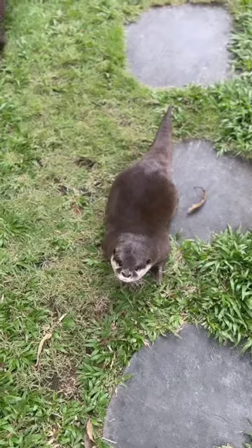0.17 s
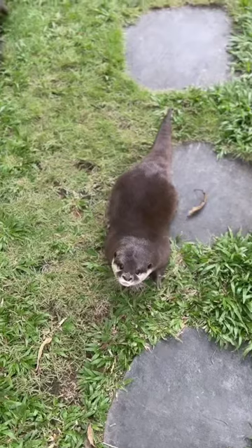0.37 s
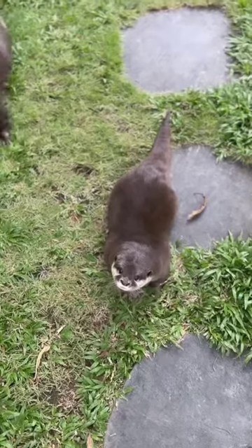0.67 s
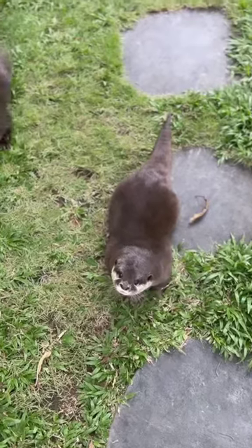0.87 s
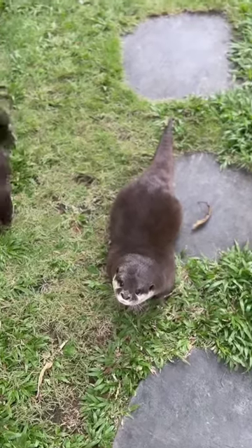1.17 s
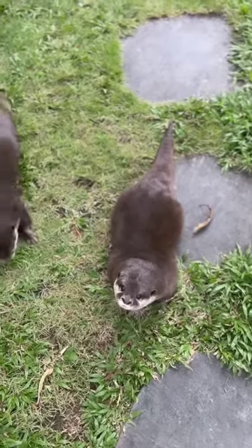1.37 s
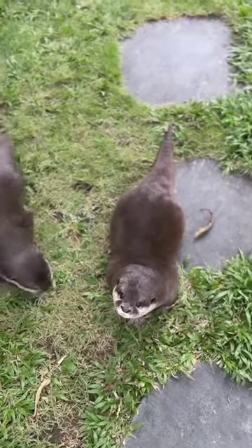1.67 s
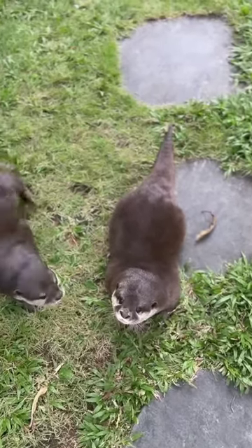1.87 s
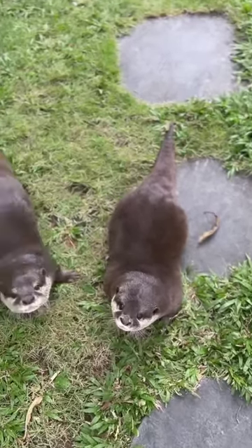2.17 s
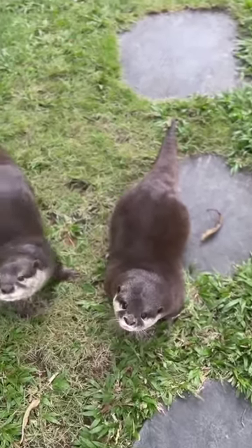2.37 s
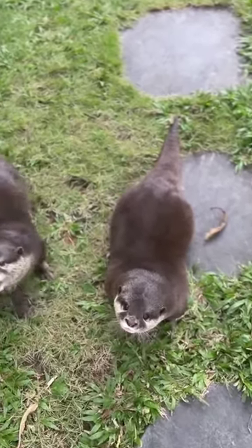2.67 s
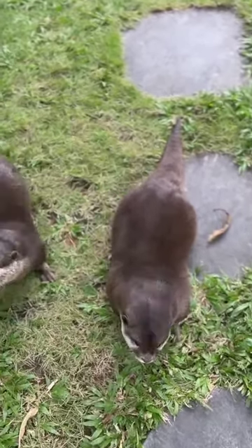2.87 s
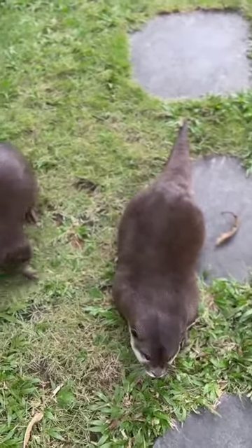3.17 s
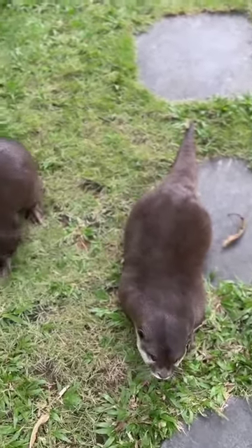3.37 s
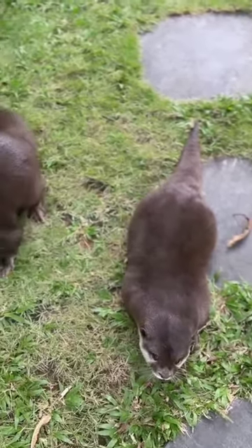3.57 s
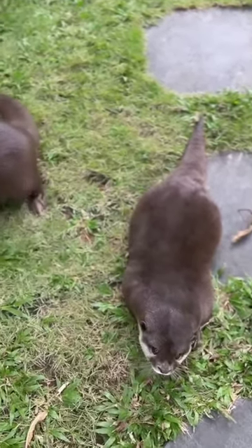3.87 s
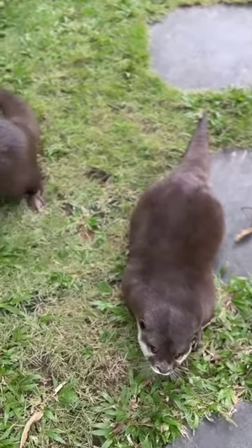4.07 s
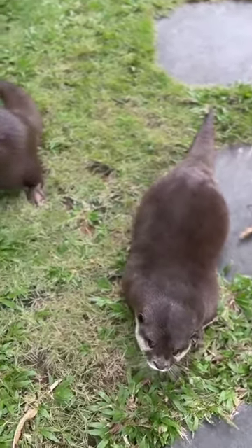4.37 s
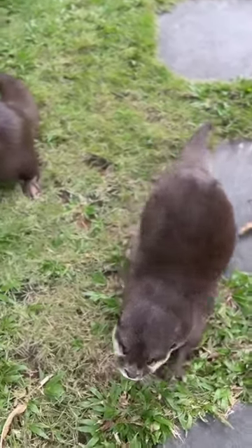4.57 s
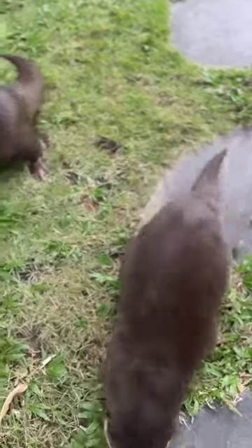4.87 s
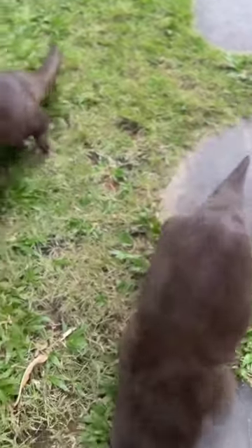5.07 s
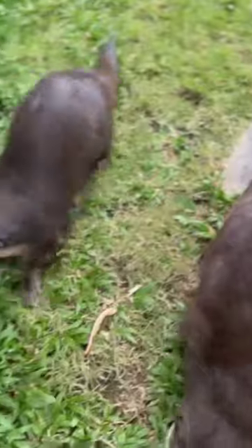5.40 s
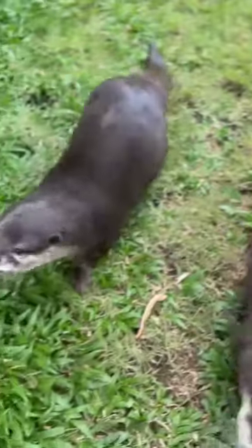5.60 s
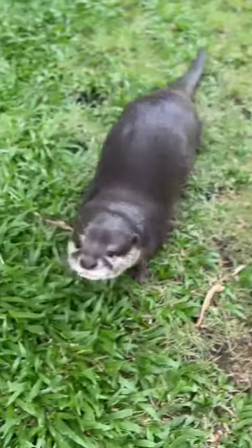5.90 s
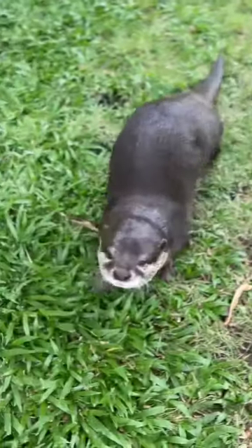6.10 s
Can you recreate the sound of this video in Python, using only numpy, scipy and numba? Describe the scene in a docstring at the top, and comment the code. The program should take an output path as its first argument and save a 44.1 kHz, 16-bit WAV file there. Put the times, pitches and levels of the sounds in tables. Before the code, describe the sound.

Two otters on a lawn give long, harsh, buzzing high squeals and quick falling chirps, with grass rustles, distant hammering and a low machine hum.

```python
"""On a lawn, two otters beg close by: long buzzing squeals, one short grunt and chirps, most high and falling.
Squeals are pulse trains and breath through moving resonances; chirps are gliding whistles in a hiss.
Paws rustle as swells of crackling noise, with a few stem snaps. Far off a hammer rings wood between walls,
a machine hums near 100 Hz, and the air is shaped noise. Two microphone ports hear the scene in stereo."""
import sys
import numpy as np
from scipy import signal
from scipy.fft import rfft, irfft, next_fast_len
from scipy.io import wavfile
from scipy.ndimage import uniform_filter1d, map_coordinates
from numba import njit

SR = 44100
rng = np.random.default_rng(int(sys.argv[2]) if len(sys.argv) > 2 else 0)


def master_out(mix):
    """Clip the mix to full scale and print it as 16-bit PCM to the path in sys.argv[1]."""
    frames = np.transpose(np.atleast_2d(mix))
    ceiling = np.clip(frames, -1, 1)
    pcm = np.round(ceiling * 32767).astype(np.int16)
    wavfile.write(sys.argv[1], SR, pcm)


def to_linear_factor(level_db):
    """Convert decibel levels (scalar or array-like) to linear amplitude factors."""
    exponent = np.asarray(level_db, float) / 20
    return 10 ** exponent


N = 275184  # samples


def unit(x):
    """Scale to rms 1."""
    return x / np.sqrt(np.mean(x ** 2) + 1e-20)


def along(points, hz):
    """Read (f/Hz, value) points on a log frequency axis."""
    f, v = np.transpose(points)
    return np.interp(np.log(hz + 1), np.log(f + 1), v)


def span(rows):
    """First sample, then one value per sample for each column after the time."""
    s, *cols = np.transpose(rows)
    n = np.arange(round(s[0] * SR), min(N, round(s[-1] * SR)))
    return n[0], [np.interp(n / SR, s, c) for c in cols]


def wobble(n, rate):
    """A smooth random curve, rate knots a second."""
    knots = rng.standard_normal(int(n * rate / SR) + 4)
    return map_coordinates(knots, [np.arange(n) * rate / SR])


def fade(n, seconds):
    """Linear fade in and out."""
    to_edge = np.minimum(np.arange(n), np.arange(n)[::-1])
    return np.clip(to_edge / (seconds * SR), 0, 1)


def filtered(x, response):
    """Filter x by a complex response of frequency."""
    m = next_fast_len(x.shape[-1] + 8192)
    return irfft(rfft(x, m) * response(np.fft.rfftfreq(m, 1 / SR)), m)[..., :x.shape[-1]]


def coloured(n, spectrum):
    """Noise of rms 1 with a given spectral shape."""
    return unit(filtered(rng.standard_normal(n), lambda hz: to_linear_factor(along(spectrum, hz))))


@njit
def resonate(x, turn, radius):
    """A two-pole resonance whose pitch and width move sample by sample."""
    y = np.zeros(len(x))
    for i in range(2, len(x)):
        echo = 2 * radius[i] * np.cos(turn[i]) * y[i - 1] - radius[i] * radius[i] * y[i - 2]
        y[i] = x[i] - x[i - 2] + echo
    return y


def cavity(x, hz, width_hz):
    """x through one moving resonance, at rms 1."""
    radius = np.exp(-np.pi * abs(width_hz + 0 * x) / SR)
    return unit(resonate(x, 2 * np.pi * (hz + 0 * x) / SR, radius))


def passed(x, hz, width_hz):
    """The part of x that lies in a moving band, at its own level."""
    radius = np.exp(-np.pi * abs(width_hz + 0 * x) / SR)
    return (1 - radius ** 2) / 2 * resonate(x, 2 * np.pi * hz / SR, radius)


def tail(decay, seconds):
    """Two unrelated noise echo tails, the first of energy 1; each frequency dies at its own speed."""
    hz, t, z = signal.stft(rng.standard_normal((2, int(seconds * SR))), SR, nperseg=128)
    dying = z * to_linear_factor(-60 * t / along(decay, hz)[:, None])
    h = signal.istft(dying, SR, nperseg=128)[1]
    return h / np.linalg.norm(h[0])


EDGE_DB = 13  # how far down fundamental and throat start and end
THROAT_GROWS = 0.0225  # share of the growth that the throat takes
# the nose swallows a band just over the mouth ring
NOSE_ABOVE_HZ, NOSE_WIDTH_HZ, NOSE_SHARE = 580, 450, .75


def buzz(rows, tract, tract_db, voice, rough, throat):
    """Vocal folds clap once a cycle and let a puff of breath through; throat, mouth and nose ring."""
    start, (hz, mouth_db, shrill_db) = span(rows)
    mouth_hz, *pitches = span(tract)[1]
    base_db, octave_db, throat_db, cheek_db, growth_db, attack, release = voice
    breath_share, first, last = rough
    n = len(hz)
    t = np.arange(n) / SR
    edge_db = -EDGE_DB * np.clip(1 - np.minimum(t / attack, t[::-1] / release), 0, 1)
    broken = (first + (last - first) * (t / t[-1]) ** 4) * (1 + .25 * wobble(n, 13))
    broken = np.clip(broken, 0, .9)

    # rough voices jitter more in pitch and in the strength of each beat
    jitter = .007 + .012 * broken
    scatter_db = .8 + 1.2 * broken
    cycles = np.cumsum(hz * (1 + jitter * wobble(n, 120))) / SR
    beat = cycles.astype(int)
    # strong and weak beats alternate and slip
    size = 1 + .45 * broken * np.sign(wobble(n, 25) + .2) * (-1) ** beat
    size = size * to_linear_factor(scatter_db * rng.standard_normal(beat[-1] + 2)[beat])

    claps = size * np.exp(-(np.sin(np.pi * cycles) * SR / hz / 4) ** 2)  # about two samples wide
    rebound = np.roll(claps, round(.0009 * SR))  # a broken beat claps again
    cracks = unit(claps + .7 * broken * rebound * wobble(n, 150))
    claps = unit(claps)
    puffs = unit((.35 + size * np.exp(-3.5 * (cycles % 1))) * rng.standard_normal(n))
    source = np.sqrt(1 - breath_share) * cracks + np.sqrt(breath_share) * puffs

    waver_db = 3
    upper = 0
    for pitch, (a, b), width_hz in zip(pitches, tract_db, [380, 280, 300, 360, 600]):
        level_db = a + (b - a) * t / t[-1] + waver_db * wobble(n, 14.51)
        upper = upper + to_linear_factor(level_db) * cavity(source, pitch * (1 + .014 * wobble(n, 12.4)), width_hz)
    upper = unit(upper) + to_linear_factor(-10 + waver_db * wobble(n, 10)) * cavity(source, 3800, 400)
    # the bare snap of the folds
    upper = upper + to_linear_factor(-11) * cavity(cavity(cracks, 5600, 4500), 6500, 5000)
    # the shrill part fades away above about 9 kHz
    upper = filtered(upper, lambda f: 1 / (1 + (f / 9300) ** 8))
    upper = upper + to_linear_factor(-36) * cavity(puffs, 10500, 3000)

    raspy = claps + (.15 + 1.1 * broken) * puffs
    low = cavity(raspy, *throat) + to_linear_factor(cheek_db - throat_db) * cavity(raspy, 1750, 600)
    breathy = claps + (.2 + 1.5 * broken) * puffs
    mouth = cavity(cavity(breathy, mouth_hz, 550), mouth_hz, 140 + 380 * broken)
    octave = to_linear_factor(octave_db - base_db) * np.cos(4 * np.pi * cycles)
    base = np.sqrt(2) * (np.cos(2 * np.pi * cycles) + octave)

    body = to_linear_factor(base_db + growth_db * t) * base
    body = body + to_linear_factor(throat_db + THROAT_GROWS * growth_db * t) * low
    call = to_linear_factor(edge_db) * body - to_linear_factor(mouth_db) * mouth + to_linear_factor(shrill_db) * upper
    call = call - NOSE_SHARE * passed(call, mouth_hz + NOSE_ABOVE_HZ, NOSE_WIDTH_HZ)
    return start, call * fade(n, 0.004)


# spectral shape of the breath in a chirp: (f/Hz, relative level/dB per Hz)
BREATH_COLOUR = [(800, -120), (1500, -16), (3000, -5), (6000, -8.5), (9000, -6.5), (12000, 2.5),
                 (15000, -38.5)]
TOP_HZ, FALL_BREATH_DB = 5500, 10  # the octave can sag under this pitch; a fast fall is breathier


def chirp(rows, octave_db, sag_db, breath_db, rough_db):
    """A whistle with overtones, fluttering in pitch and level, in a hiss of breath."""
    start, (hz, db) = span(rows)
    n = len(hz)
    falling = np.clip(-np.gradient(uniform_filter1d(hz, 200)), 0, 1.5)  # Hz a sample
    phase = 2 * np.pi * np.cumsum(hz * (1 + (.014 + .02 * falling) * wobble(n, 400))) / SR
    rough_db = rough_db + 3 * falling  # the tone breaks up while it falls
    second_db = db + octave_db - sag_db * np.maximum(TOP_HZ - hz, 0) / 1000
    whistle = to_linear_factor(db + rough_db * np.minimum(wobble(n, 270.33), .5)) * np.sin(phase)
    overtones = np.sin(2 * phase) + to_linear_factor(-11.5) * np.sin(3 * phase) * (hz < 4500)
    overtones = to_linear_factor(second_db + rough_db * np.minimum(wobble(n, 253.8), .5)) * overtones
    hiss = to_linear_factor(breath_db + FALL_BREATH_DB * falling) * coloured(n, BREATH_COLOUR)
    return start, (np.sqrt(2) * (whistle + overtones) + hiss) * fade(n, 0.00055)


# path of each buzzing call, the grunt last: (t/s, pitch f/Hz, mouth ring level/dB, shrillness level/dB)
SQUEAL_PATHS = [
    [(.02, 217.5, -26.5, -35), (.14, 219.4, -28.5, -32.5), (.23, 218.6, -28, -28.5),
     (.33, 226.1, -31.5, -26), (.37, 228.3, -22.5, -24.5), (.42, 222.5, -24.5, -29), (.5, 224.4, -27, -36),
     (.6, 232.2, -33.5, -35), (.66, 225, -30, -39), (.72, 212.3, -48.5, -50)],
    [(2.43, 215.8, -53.5, -59), (2.48, 220.9, -25.5, -34), (2.525, 254.8, -30.5, -28.5),
     (2.575, 231.6, -27, -26), (2.66, 219.2, -30, -31.5), (2.75, 239.9, -25.5, -24),
     (2.8, 232.1, -27, -25.5), (2.92, 232, -25.5, -25.5), (3.02, 231.8, -26.5, -26.5),
     (3.18, 219, -30.5, -28), (3.22, 226.4, -26.5, -26), (3.31, 231.3, -27, -26), (3.4, 240, -27, -31.5),
     (3.5, 252.7, -24.5, -30), (3.57, 236.5, -27.5, -42.5), (3.68, 246.3, -31.5, -42),
     (3.74, 219.4, -56.5, -66)],
    [(4.52, 223.1, -32, -38.5), (4.58, 248.5, -27.5, -34), (4.62, 248.8, -26.5, -26),
     (4.73, 257.7, -23.5, -28), (4.82, 249, -25.5, -28), (4.92, 239.8, -28, -30.5), (5.04, 245.4, -22, -31),
     (5.09, 242.6, -21.5, -28), (5.15, 247.4, -24, -31), (5.2, 240, -25, -35.5),
     (5.25, 220.9, -73.5, -55.5)],
    [(5.695, 370.3, -53, -74), (5.711, 398.2, -31.5, -47), (5.747, 374.7, -24.5, -42),
     (5.78, 386.5, -37, -45), (5.8, 391, -75.5, -80.5)],
]
# resonances move with jaw and lips in each call: (t/s, mouth f/Hz, five upper resonances f/Hz)
TRACT_PATHS = [
    [(.02, 2600, 4300, 4750, 5600, 6900, 7800), (.12, 2620, 4300, 4750, 5700, 7000, 7900),
     (.2, 2760, 4300, 4800, 6000, 7400, 8300), (.28, 2800, 4300, 4850, 6400, 8000, 8900),
     (.33, 2600, 4500, 5600, 7000, 8500, 9300), (.4, 2520, 4750, 6200, 7700, 9000, 9600),
     (.45, 2480, 4700, 6400, 7900, 9000, 9600), (.54, 2450, 4500, 6100, 7500, 8500, 9300),
     (.6, 2420, 4700, 6000, 7300, 8300, 9200), (.66, 2550, 4700, 6050, 7200, 8200, 9200),
     (.72, 2700, 4500, 5900, 7200, 8200, 9200)],
    [(2.43, 2250, 4300, 4800, 5400, 6000, 7900), (2.52, 2600, 4300, 4900, 5450, 6150, 8100),
     (2.65, 2620, 4300, 5000, 5500, 6300, 8200), (2.85, 2580, 4300, 5050, 5700, 6700, 8400),
     (3.05, 2530, 4250, 4950, 5900, 6600, 8200), (3.2, 2520, 4150, 4800, 5600, 6300, 8000),
     (3.32, 2520, 4250, 4900, 5600, 6450, 8000), (3.42, 2780, 4500, 5300, 6100, 6750, 8300),
     (3.6, 2700, 4500, 5200, 5900, 6600, 8000), (3.68, 2350, 4600, 5200, 5800, 6400, 7800),
     (3.74, 2300, 4600, 5200, 5800, 6400, 7800)],
    [(4.52, 2400, 3700, 4800, 5700, 6500, 7500), (4.64, 2420, 4250, 4800, 5700, 6550, 7600),
     (4.71, 2600, 4100, 4850, 6000, 7200, 8500), (4.78, 2680, 4100, 5300, 6550, 8100, 9000),
     (4.9, 2620, 4100, 5300, 6600, 7900, 9000), (5.02, 2680, 4450, 5500, 6550, 7600, 8800),
     (5.1, 2680, 4000, 5100, 6300, 7600, 8600), (5.25, 2550, 4100, 4750, 6000, 7500, 8500)],
    [(5.695, 2450, 3940, 5100, 6000, 6900, 8400), (5.8, 2350, 3940, 5100, 6000, 6900, 8400)],
]
# balance of those five in each call: (level/dB at the start, level/dB at the end)
TRACT_BALANCE = [
    [(-9, -2), (1, -1), (2, -6), (-5, -10), (-9, -15)],
    [(-3, 0), (-1, -4), (-2, -2), (-1, -4), (-5, -8)],
    [(-2, -1), (0, -3), (0, -1), (-5, -12), (-11, -17)],
    [(-2, -2), (-4, -4), (-1, -1), (-6, -6), (-9, -9)],
]
# voice of each call: (fundamental level/dB, its octave level/dB, throat level/dB, cheek level/dB,
# growth/dB per s, attack t/s, release t/s)
CALL_VOICES = [(-43.5, -51.5, -50.5, -50.5, 3, 0.0063, 0.066), (-46.5, -67.5, -44.5, -47, 7, 0.036, 0.1835),
               (-44.5, -65, -39.5, -51.5, 14, 0.0433, 0.0318), (-54.5, -63.5, -38, -49, -60, 0.006, 0.0485)]
# roughness of each call: (breath share 0-1, broken beat at the start 0-1, at the end 0-1)
ROUGHNESS = [(.35, .12, .6), (.6, .2, .9), (.55, .75, .7), (.09, .09, .03)]
# low resonance in each call: (f/Hz, width f/Hz)
THROAT_RINGS = [(763.7, 67), (1000, 283), (636.2, 830), (810.4, 83)]
# path of each chirp: (t/s, pitch f/Hz, level/dB)
CHIRP_PATHS = [
    [(.245, 5500, -47), (.27, 5700, -39), (.3, 5300, -41), (.33, 5400, -56), (.345, 4490, -41),
     (.368, 2865, -39), (.376, 1272, -50.5), (.4, 1000, -38), (.418, 940, -42)],
    [(2.142, 5040, -48.5), (2.15, 5570, -47), (2.165, 5230, -57), (2.19, 5483, -33), (2.212, 5555, -29),
     (2.228, 5395, -40), (2.27, 2350, -33), (2.275, 1290, -47), (2.3, 972, -48)],
    [(4.292, 1000, -72), (4.302, 890, -50), (4.315, 900, -64.5)],
    [(4.378, 4390, -47.5), (4.394, 5430, -42.5), (4.41, 5626, -49), (4.45, 5285, -49), (4.47, 4371, -40.5),
     (4.505, 2910, -29), (4.525, 2295, -38), (4.55, 2135, -53.5)],
    [(5.992, 4522, -37), (6.005, 4850, -33), (6.022, 5972, -32.5), (6.033, 5920, -41.5), (6.045, 4950, -36),
     (6.06, 3240, -23.5), (6.075, 2126, -40), (6.087, 1132, -56.5), (6.095, 1000, -45)],
]
# timbre of each chirp: (octave over the tone at the top level/dB, its sag as pitch drops/dB per kHz,
# breath level/dB)
CHIRP_TIMBRES = [(13, 18, -62), (0.5, 6, -50.5), (0, 5, -47.5), (6, 6.5, -49), (2, 5.5, -50)]


def otters():
    """All squeals, the grunt and the chirps in their places."""
    out = np.zeros(N)
    voices = zip(SQUEAL_PATHS, TRACT_PATHS, TRACT_BALANCE, CALL_VOICES, ROUGHNESS, THROAT_RINGS)
    calls = [buzz(*voice) for voice in voices]
    calls += [chirp(rows, *timbre, rough_db=10.5) for rows, timbre in zip(CHIRP_PATHS, CHIRP_TIMBRES)]
    for start, call in calls:
        out[start:start + len(call)] += call
    return out


# scatter near the ground: (f/Hz, t60 t/s)
LAWN_DECAY = [(300, 0.01), (3000, 0.02), (5500, 0.035), (10000, 0.03)]


def scattered(x):
    """Short echoes off grass and stones change as the animals move their heads: two tails cross-fade."""
    turn = 2.5 * wobble(N, 5)
    echoes = np.zeros((2, N))
    for weight in (np.cos(turn), np.sin(turn)):
        echoes += signal.fftconvolve((x * weight)[None], tail(LAWN_DECAY, .08), axes=1)[:, :N]
    return echoes


# paws and bodies in the grass: (loudest at t/s, swell t/s, fade t/s, dull swish level/dB,
# bright crackle level/dB)
RUSTLES = [(0.731, 0.0754, 0.0268, -46, -37), (0.811, 0.032, 0.078, -49.5, -66.5),
           (1.389, 0.1343, 0.121, -51, -46), (1.91, 0.0416, 0.081, -52.5, -51.5),
           (3.717, 0.0067, 0.042, -70.5, -55), (3.876, 0.0468, 0.0256, -52.5, -70.5),
           (3.959, 0.063, 0.0708, -32.5, -43.5), (4.078, 0.0187, 0.0116, -58.5, -66),
           (4.211, 0.0997, 0.148, -43, -47), (5.24, 0.059, 0.1262, -70.5, -46.5),
           (5.411, 0.21, 0.109, -46.5, -46), (5.69, 0.0462, 0.187, -48, -44.5),
           (5.799, 0.0095, 0.04, -67.5, -58.5), (5.948, 0.091, 0.192, -43.5, -46),
           (6.098, 0.0058, 0.15, -69.5, -51), (6.23, 0.041, 0.035, -43.5, -39)]
# stems break: (t/s, starting level/dB, pitch f/Hz)
STEM_SNAPS = [(.056, -27, 11000), (2.727, -21, 12000), (3.8428, -46, 1900), (3.9124, -39, 2200),
              (3.9422, -21, 4000), (4.0782, -42, 2200), (4.3034, -48, 3200), (6.2048, -34, 3200)]
SWISH_DEPTH_DB = 17.5  # level at the start of a swell and the end of a fade, under the peak


def grass():
    """Blades crackle in clumps on a swish, as noise in two bands; a few stems snap as short bursts."""
    dull_colour = [(500, -120), (900, -7.0), (2300, 2), (3000, 8.5), (4000, 13.5), (7000, -54), (9000, -120)]
    bright_colour = [(2000, -120), (3000, 7.5), (4500, -8.5), (7000, -11.5), (10500, -4.0), (13500, 0),
                     (15000, -120)]
    out = np.zeros(N + SR)
    for s, swell, fall, dull_db, bright_db in RUSTLES:
        start, (away,) = span([(s - swell, -1), (s, 0), (s + fall, 1)])
        n = len(away)
        crackle = to_linear_factor(2.5 * wobble(n, 400) + 2 * wobble(n, 40))
        dull = unit(crackle * coloured(n, dull_colour))
        bright = unit(crackle * coloured(n, bright_colour))
        rustle = to_linear_factor(dull_db) * dull + to_linear_factor(bright_db) * bright
        out[start:start + n] += to_linear_factor(-SWISH_DEPTH_DB * away ** 2) * rustle
    t = np.arange(400) / SR
    for s, db, hz in STEM_SNAPS:
        splinters = rng.standard_normal(len(t)) + 3 * (t == t[2])  # a sharp break on top
        out[round(s * SR):][:len(t)] += to_linear_factor(db - 60 * t / 0.008) * cavity(splinters, hz, 1.5 * hz)
    return out[:N]


def struck(modes, rise, t60):
    """A burst of noise, smeared by distance, in the resonances of the wood; rms 1 over the first 1/30 s."""
    t = np.arange(SR // 4) / SR
    burst = (1 - np.exp(-t / rise)) * to_linear_factor(-60 * t / t60) * rng.standard_normal(len(t))

    def wood(f):
        total = 0
        for k, (centre, width, db) in enumerate(modes):
            band = 1j * f * width / (centre * centre - f * f + 1j * f * width)
            total = total + (-1) ** k * to_linear_factor(db) * band
        return total

    ring = filtered(burst, wood)
    return ring / np.sqrt(np.mean(ring[:SR // 30] ** 2))


# hammer blows: (t/s, thud level/dB, knock level/dB)
HAMMER_BLOWS = [(0.254, -44.5, -52), (0.697, -42.5, -48.5), (1.119, -45, -48), (1.544, -41, -45),
                (1.957, -45, -46.5), (2.374, -39.5, -47.5), (2.78, -34, -39), (3.179, -35, -47),
                (3.57, -35.5, -41.5)]
# slaps from walls: (delay t/s, thud level/dB, knock level/dB), levels relative to the blow
WALL_SLAPS = [(.053, 0.5, -4), (.078, -5.5, -20.5), (.1, -3.5, -11)]
# resonances of the knock: (f/Hz, width f/Hz, level/dB)
PLANK_MODES = [(411, 90.2, 8.5), (515, 335.7, 3.5), (709, 77, 5), (890, 96.5, -1.5), (1127.3, 202, -3.5),
               (1642, 544, -12), (2056, 373, -15), (2667, 226, -6), (4360, 1370, -30.5)]
# resonances of the low wood in the thud: (f/Hz, width f/Hz, level/dB)
BEAM_MODES = [(149.3, 52, -0.5), (189.4, 24.6, 6), (240, 37, -1.5)]
# echo of the yard: (f/Hz, t60 t/s)
YARD_DECAY = [(150, 0.182), (800, 0.365), (3000, 0.37), (9000, 0.06)]


def hammer():
    """Each blow thuds and knocks, slaps back from walls and dies in the yard: direct sound and stereo tail."""
    near, far = np.zeros(N + SR), np.zeros((2, N + SR))
    for s, thud_db, knock_db in HAMMER_BLOWS:
        knock = to_linear_factor(knock_db) * struck(PLANK_MODES, rise=0.004, t60=0.045)
        for delay, low_db, high_db in [(0.0015, 0.045, 0)] + WALL_SLAPS:
            # each path smears the thud anew
            thud = to_linear_factor(thud_db + low_db) * struck(BEAM_MODES, rise=0.00104, t60=0.0391)
            near[round((s + delay) * SR):][:len(thud)] += thud + to_linear_factor(high_db) * knock
        echo = signal.fftconvolve(knock[None], tail(YARD_DECAY, 0.9506), axes=1)
        far[:, round((s + .01) * SR):][:, :echo.shape[1]] += to_linear_factor(2.5) * echo
    return near[:N], far[:, :N]


# machine tones: (f/Hz, level/dB rms, width f/Hz)
HUM_TONES = [(99.9, -43, 5), (48.38, -59, 4.8), (64, -82, 5.9), (177.66, -61, 10)]


def hum():
    """Steady machine tones that waver in pitch and strength."""
    total = np.zeros(N)
    for hz, db, width in HUM_TONES:
        level = np.sqrt(2) * to_linear_factor(db + 0.76 * wobble(N, 3 * width))
        cycles = np.cumsum(hz + width / 2 * wobble(N, 3 * width)) / SR
        total += level * np.sin(2 * np.pi * cycles)
    return total


# spectral shape of the air: (f/Hz, relative level/dB per Hz)
AIR_COLOUR = [(15, -57), (30, -22), (40, -13.5), (80, -5), (107, -4.5), (151, -10.5), (286, -15.5),
              (525, -22), (741, -26), (1680, -33), (1920, -39.5), (2140, -30), (6670, -37.5),
              (12300, -42.5), (14000, -95.5)]
# left-right likeness of the air: (f/Hz, likeness 0-1)
AIR_LIKENESS = [(30, .985), (150, .99), (300, .95), (700, .5), (1000, .2), (1700, .6), (3500, .1),
                (5500, .6), (12000, .4)]
AIR_DB = -50


def air():
    """Far traffic and leaves as shaped noise: part shared by both ports, part unrelated."""
    def alike(hz):
        return np.clip(along(AIR_LIKENESS, hz), 0, 1)

    shared = ports(filtered(coloured(N, AIR_COLOUR), lambda hz: np.sqrt(alike(hz))))
    apart = np.array([coloured(N, AIR_COLOUR), coloured(N, AIR_COLOUR)])
    apart = filtered(apart, lambda hz: np.sqrt(1 - alike(hz)))
    return to_linear_factor(AIR_DB + 2.96 * wobble(N, 2.975)) * (shared + apart)


# phase between two microphone ports: (f/Hz, left lead/rad)
PORT_LEAD = [(200, 0), (350, .15), (700, .8), (1000, .4), (1400, .1), (1750, .1), (2070, 1), (2350, 2.1),
             (2760, 2.4), (3200, 3.1), (4100, 3.3), (4500, 3.6), (5200, 5.4), (5900, 6), (7000, 5.4),
             (8300, 4.75), (9000, 4.3), (10000, 3.8), (15000, 3.7)]
# level between the ports: (f/Hz, left minus right level/dB)
PORT_TILT = [(200, 0), (380, 1.5), (700, 5.5), (1030, 6), (1250, 2), (1600, 0), (2400, -1), (3100, 1),
             (4100, 3), (5200, 1), (6000, 0), (15000, 0)]


def ports(x):
    """The two ports hear one sound with a level shift, the right one later by a pitch-dependent phase."""
    def left_right(hz):
        half_db = along(PORT_TILT, hz) / 2
        return np.array([to_linear_factor(half_db), to_linear_factor(-half_db) * np.exp(-1j * along(PORT_LEAD, hz))])

    return filtered(x, left_right)


def scene():
    """Near animals and grass, far hammer, hum and air."""
    voices, (knock, yard) = otters(), hammer()
    high = filtered(voices, lambda hz: hz ** 2 / (hz ** 2 + 700 ** 2))  # the ground scatters mostly treble
    scatter = to_linear_factor(-7) * scattered(high)
    ring = to_linear_factor(-20) * signal.fftconvolve(high[None], tail(YARD_DECAY, 0.15), axes=1)[:, :N]
    return ports(voices + knock + grass()) + scatter + ring + yard + air() + hum()


def low_pass(x):
    """Removes everything above the highest recorded frequency."""
    return signal.sosfilt(signal.butter(12, 15740, fs=SR, output="sos"), x)


# microphone response: (f/Hz, level/dB)
MIC_RESPONSE = [(20, 1.5), (8500, 1), (10000, 1.5), (11200, -4), (12500, -4.5), (14000, -8.5),
                (16000, -56.5)]
START = .0355  # s of silence at the start


def record(dry):
    """The microphone dulls the top; sound sets in after a short silence."""
    heard = filtered(dry, lambda hz: to_linear_factor(along(MIC_RESPONSE, hz)))
    mix = heard * (np.arange(N) >= START * SR)
    return low_pass(mix)


dry = scene()
out = record(dry)
master_out(out)
```